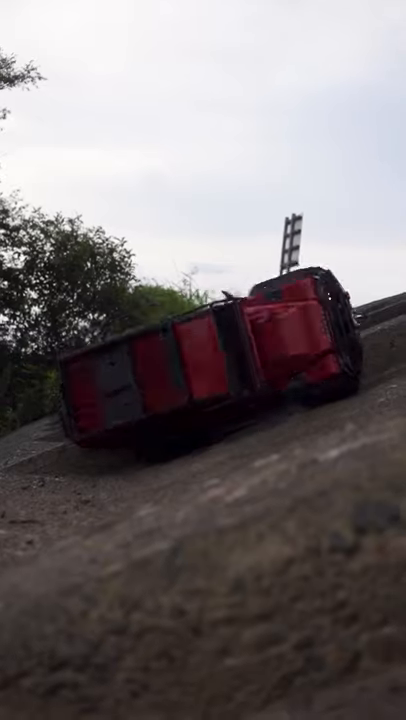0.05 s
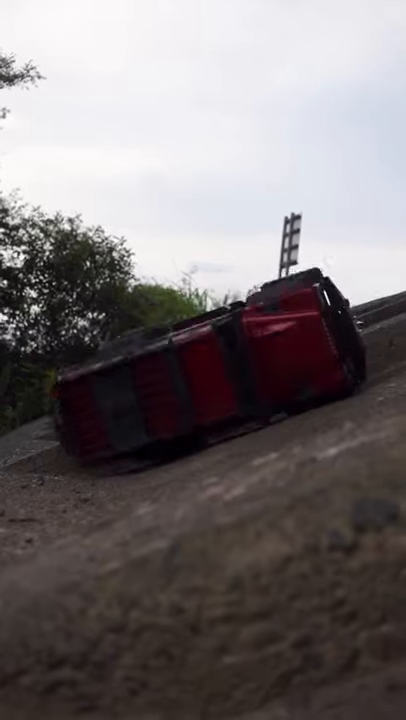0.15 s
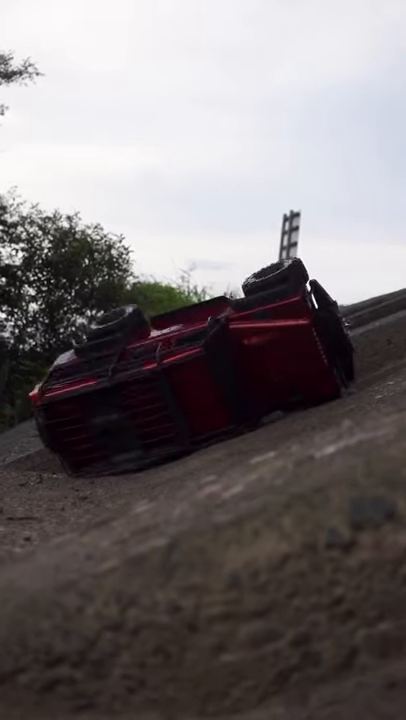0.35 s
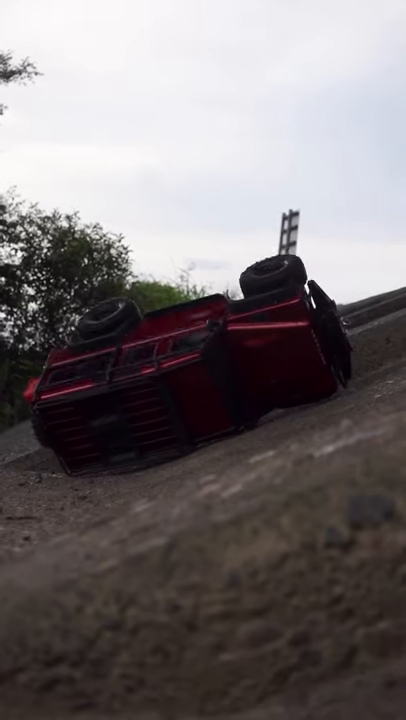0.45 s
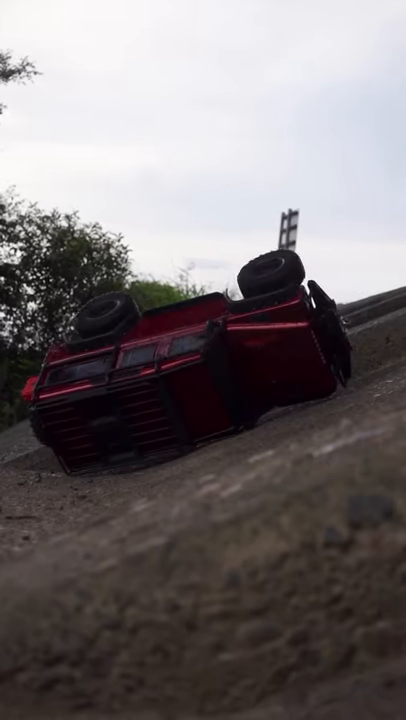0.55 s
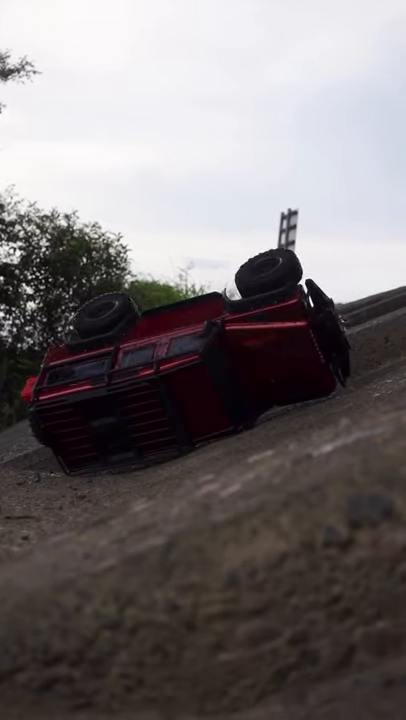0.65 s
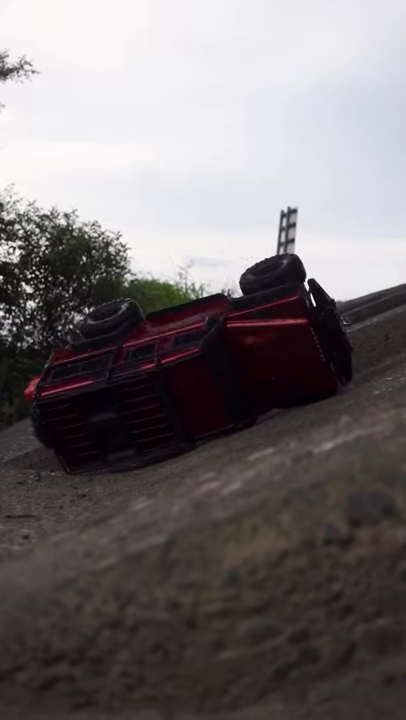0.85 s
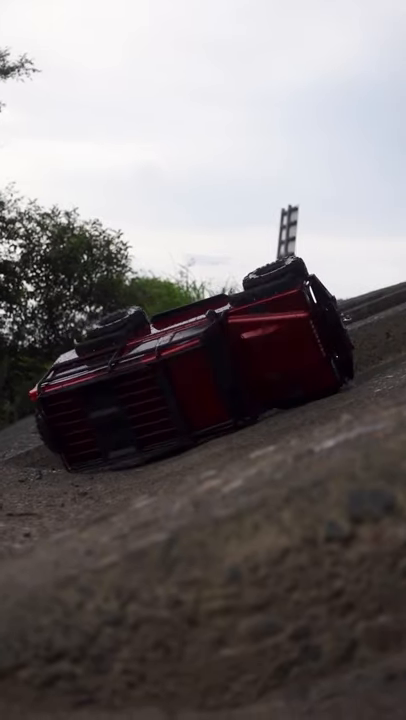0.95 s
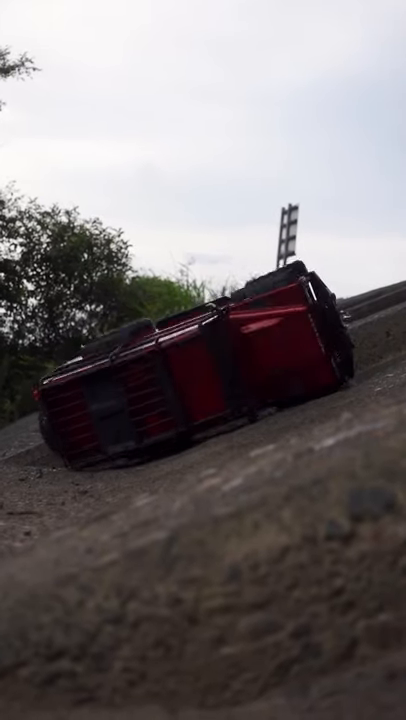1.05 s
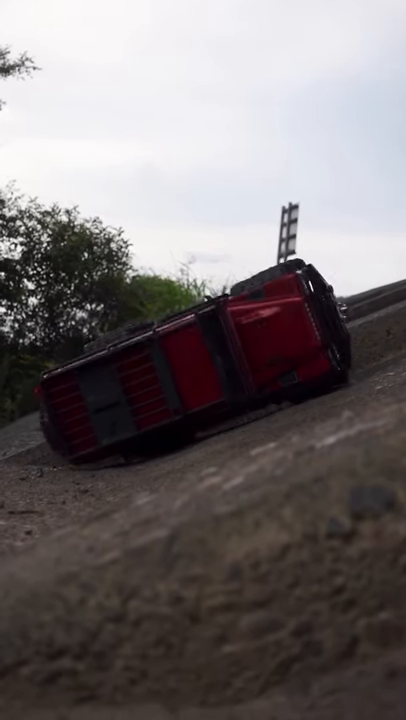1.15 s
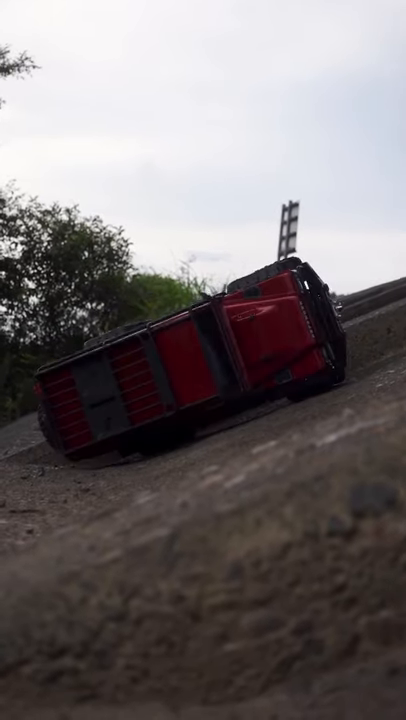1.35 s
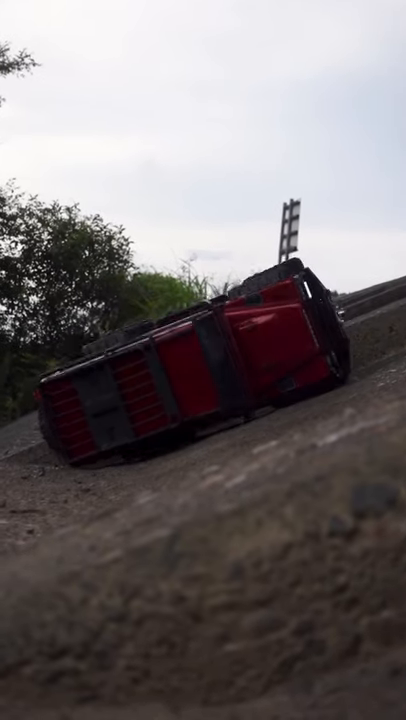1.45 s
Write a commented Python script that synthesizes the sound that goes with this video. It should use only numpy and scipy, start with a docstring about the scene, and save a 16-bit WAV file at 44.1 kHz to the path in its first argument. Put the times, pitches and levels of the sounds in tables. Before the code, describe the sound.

A small plastic toy truck tips over on a hard slope: hollow slam and gritty scrape, quiet rocking knocks, then a lighter clack as it falls back. Close stereo microphone outdoors, faint cicadas, ticking katydids and distant air.

```python
"""On a hard slope outdoors, air rumbles far off; a cicada chorus hums and two katydids tick higher up.
Near a pair of close microphone ports a small plastic truck tips over: its hollow shell slams down,
scrapes, rocks with small knocks and falls back. Air and cicadas are coloured noise, katydids are
pulsed noise through wing resonances, the shell is decaying modes, and the ground adds thud and grit.
"""
import sys
import numpy as np
from scipy import signal
from scipy.fft import rfft, irfft, next_fast_len
from scipy.io import wavfile
from scipy.ndimage import map_coordinates

SR = 44100
rng = np.random.default_rng(int(sys.argv[2]) if len(sys.argv) > 2 else 0)


def unload_wav(signal):
    """Save mono or channel-first audio to the path in sys.argv[1] as 16-bit WAV at rate SR, clipped to [-1, 1]."""
    wavfile.write(
        sys.argv[1],
        SR,
        np.round(np.clip(np.atleast_2d(signal).T, -1, 1) * 32767).astype(np.int16),
    )


N = 66150  # samples, 1.5 s


def amp(db):
    """Turn dB into linear gain."""
    return 10 ** (np.asarray(db) / 20)


def unit(x):
    """Scale a signal to rms 1."""
    return x / np.sqrt(np.mean(x ** 2) + 1e-20)


def noise():
    """White noise over the whole scene."""
    return rng.standard_normal(N)


def along(points, hz):
    """Interpolate (Hz, value) points on a log frequency axis."""
    point_hz, value = np.transpose(points)
    return np.interp(np.log(hz + 1), np.log(point_hz + 1), value)


def curves(rows):
    """One value per sample for each column after the time; -120 before the first row."""
    seconds, *columns = np.transpose(rows)
    return [np.interp(np.arange(N) / SR, seconds, column, left=-120) for column in columns]


def wobble(rate):
    """A smooth random curve with `rate` knots a second."""
    knots = rng.standard_normal(int(N * rate / SR) + 4)
    return map_coordinates(knots, [np.arange(N) * rate / SR])


def filtered(x, response):
    """Multiply the spectrum of x by a complex response of frequency."""
    size = next_fast_len(N + SR // 2)
    return irfft(rfft(x, size) * response(np.fft.rfftfreq(size, 1 / SR)), size)[..., :N]


def coloured(x, spectrum):
    """Shape x by a relative spectrum that is closed at both ends, then scale to rms 1."""
    below = (spectrum[0][0] * .9, -90)
    above = (spectrum[-1][0] * 1.06, -90)
    closed = [below, *spectrum, above]
    return unit(filtered(x, lambda hz: amp(along(closed, hz))))


def resonances(peaks):
    """Causal response of (Hz, width in Hz, dB) resonators, added with alternating signs."""
    def response(f):
        total = 0
        for k, (centre, width, db) in enumerate(peaks):
            damping = 1j * f * width
            total = total + (-1) ** k * amp(db) * damping / (centre ** 2 - f ** 2 + damping)
        return total
    return response


def impulses(per_s, spread_db):
    """Random contacts of uneven size and either sign."""
    happens = rng.random(N) < per_s / SR
    return happens * noise() * amp(spread_db * rng.exponential(size=N))


# Spectrum of the distant air. Each row: frequency in Hz, relative density in dB per Hz.
AIR = [(15, -47), (25, -24.5), (91, -1), (212, -6), (409, -11), (657, -16), (876, -16.5), (1270, -27),
       (1530, -23.5), (1950, -30), (2350, -16), (3400, -20.5), (4420, -47), (7480, -120)]
# Loudness of the distant air. Each row: time in seconds, level in dB before the random lumps.
AIR_LEVEL = [(0., -50), (.13, -56.5), (.3, -49), (1.5, -55)]
# Spectrum of the faint hiss. Each row: frequency in Hz, relative density in dB per Hz.
HISS = [(2410, -45), (4100, -7), (4170, -19.5), (4660, -39), (4720, -35), (6290, -33.5), (8190, -30),
        (8750, -35), (10000, -29), (11000, -32), (14300, -66), (22000, -120)]
RUMBLE_HZ, HISS_DB = 172, -65.5  # split between rumble and steadier air; hiss rms


def air():
    """Far rumble coming in lumps under steadier air, with a faint hiss: all shaped noise."""
    far = amp(curves(AIR_LEVEL)[0]) * coloured(noise(), AIR)
    rumble = filtered(far, lambda hz: 1 / (1 + (hz / RUMBLE_HZ) ** 4))
    hiss = amp(HISS_DB) * coloured(noise(), HISS)
    lumps = amp(3 * wobble(14))
    steadier = amp(1.5 * wobble(8.4))
    return lumps * rumble + steadier * (far - rumble) + hiss


# Spectrum of the blended cicadas. Each row: frequency in Hz, relative density in dB per Hz.
CHORUS = [(1940, -39.5), (3300, -27), (3430, -75), (3470, -0.5), (3680, 16), (3820, 20), (3940, 18),
          (4200, -41.5), (4300, -2.5), (5590, -65.5), (9460, -120)]
# Loudness of the chorus. Each row: time in seconds, level in dB before the random wobble.
CHORUS_LEVEL = [(0.0, -47.5), (0.442, -48.5), (0.976, -47), (1.16, -48.5), (1.5, -48)]


def cicadas():
    """Many singers blend into one narrow band of noise whose level wavers fast and slowly."""
    level_db, = curves(CHORUS_LEVEL)
    waver_db = 0.9 * wobble(22) + 0.68 * wobble(6.57)
    return amp(level_db + waver_db) * coloured(noise(), CHORUS)


# Wing resonances, one list a singer. Each row: frequency in Hz, width in Hz, gain in dB for one pass.
KATYDID = [
    [(7550, 130, -1.5), (8960, 350, 0)],
    [(9630, 480, 2), (10300, 300, -7)],
]
# Loudness of the song. Each row: time in seconds, then each singer's level in dB before the swells.
SONG = [(0.0, -79, -77.5), (0.178, -80, -88), (0.274, -79, -70), (0.422, -77.5, -80), (0.784, -74, -83),
        (1.168, -84.5, -70), (1.186, -78.5, -73), (1.398, -83.5, -73.5), (1.5, -75, -73.5)]
TICKS_HZ, TICK_S = (39.8, 32), (.705, .955)  # mean tick rate; time near which a tick peaks (s)
SWELL_HZ, SWELL_S, SWELL_DB = 7.95, .705, 3.5  # rate, time of one peak (s), rise and fall


def katydids():
    """Noise passes twice through each singer's wings and is pulsed into ticks that swell together."""
    t = np.arange(N) / SR
    swell_db = SWELL_DB * np.cos(2 * np.pi * SWELL_HZ * (t - SWELL_S))
    out = np.zeros(N)
    for peaks, song_db, rate_hz, peak_s in zip(KATYDID, curves(SONG), TICKS_HZ, TICK_S):
        wings = resonances(peaks)
        phase = 2 * np.pi * rate_hz * (t - peak_s) + 2 * wobble(9.6)  # uneven timing
        ticks = unit(np.abs(0.61 + 0.42 * np.cos(phase)) ** 0.94)
        voice = unit(filtered(filtered(noise(), wings), wings))
        out += amp(song_db + swell_db + 3.5 * wobble(25)) * ticks * voice
    return out


# Modes of the hollow shell, for scrape and knocks.
# Each row: nominal frequency in Hz, relative level in dB, time to decay by 60 dB in seconds.
SHELL = [(98, -14, .12), (140, -16, .08), (236, 0, .14), (282, 0, .1), (322, -1, .09), (365, 0, .11),
         (472, 0, .09), (570, -2, .06), (750, -8, .05), (990, -8, .07), (1065, -8, .07), (1500, -12, .03),
         (2250, -15, .025), (3050, -14, .04)]
UPPER_HZ = 680  # the shell's upper modes start here
# Shell dragging on the ground. Each row: time in seconds, then relative levels in dB of
# the ringing body, the thud under it, the mid rattle, the crunch and the grit.
SCRAPE = [(.18, -65, -63, -83, -76, -93), (.19, -31, -71, -55, -73.5, -87),
          (.206, -28.5, -27.5, -49, -58, -77.5), (.226, -22, -32, -41, -50.5, -70),
          (.23, -32, -30.5, -36.5, -34.5, -54), (.243, -17, -25.5, -25.5, -33.5, -45),
          (.266, -17, -22, -28.5, -35.5, -48.5), (.295, -23, -26.5, -31.5, -40, -48.5),
          (.32, -25, -32, -37, -43, -54.5), (.35, -20.5, -26.5, -27, -39.5, -52),
          (.37, -28, -37.5, -38.5, -44.5, -55.5), (.4, -30, -38, -42, -48.5, -60.5),
          (.452, -34.5, -44.5, -45.5, -55, -65), (.5, -48, -72, -48, -58, -68),
          (.57, -45.5, -51, -54.5, -59, -72), (.62, -38.5, -38, -58, -58, -87),
          (.67, -55, -57, -56.5, -76, -95), (.75, -55.5, -45.5, -66.5, -67, -82),
          (.85, -49, -45.5, -82, -71, -92), (.94, -69, -46, -97, -88, -90),
          (1., -46, -54.5, -64.5, -56.5, -81), (1.03, -57, -51.5, -91, -87, -98),
          (1.112, -47.5, -64, -82, -77, -94), (1.128, -32, -57, -61, -64, -86),
          (1.148, -32, -35, -40.5, -44.5, -59), (1.186, -39, -35, -52.5, -51, -68),
          (1.191, -18, -32, -31, -32, -51.5), (1.21, -27, -35.5, -37.5, -53.5, -55),
          (1.23, -32, -33, -45, -50.5, -63.5), (1.265, -33, -42.5, -44.5, -51, -65),
          (1.32, -40.5, -43.5, -48.5, -56.5, -71.5), (1.373, -45, -43, -56.5, -60.5, -75),
          (1.42, -53, -81, -62, -61.5, -89), (1.476, -55, -79, -57, -59, -86),
          (1.49, -55, -44, -37.5, -56, -85)]
# Spectra of thud, rattle, crunch and grit. Each row: frequency in Hz, relative density in dB per Hz.
THUD = [(40, -29), (70, -8), (100, -8), (130, -5.5), (200, -12.5)]
RATTLE = [(500, -8), (700, 1), (1100, -4.5), (1500, -7), (2000, -18), (2400, -19)]
CRUNCH = [(1700, 2.5), (2100, -1.5), (3000, -2), (3900, -1.5), (4500, -7), (5200, -43)]
GRIT = [(2710, -18), (4600, -1.5), (6020, -12.5), (6840, -9), (8290, -23.5), (9870, -28.5), (10400, -35),
        (11000, -22), (14300, -74), (22000, -120)]
THUD_HZ, THUD_ROUGH = 96.88, 0.58  # the ground's soft note; gain of the noise in it
NOTE_DB = -32  # thud level at which the note is at half gain


def grains():
    """Dense small ground contacts, 8000 a second on average."""
    return impulses(8000, spread_db=1.2)


def scrape():
    """Small contacts ring the shell's low modes and thud the ground; grit crunches under it."""
    body_db, thud_db, rattle_db, crunch_db, grit_db = curves(SCRAPE)
    # a mode's width follows from its decay time
    low_modes = [(hz, np.log(1000) / np.pi / t60, db) for hz, db, t60 in SHELL if hz < UPPER_HZ]
    ring = resonances(low_modes)
    contacts = unit(impulses(2500, spread_db=1.2))
    body = filtered(amp(body_db - 6) * contacts, ring) / np.std(filtered(contacts, ring))

    phase = 2 * np.pi * np.cumsum(THUD_HZ * (1 + 0.043 * wobble(25.47))) / SR
    note_gain = 1 / (1 + amp(2 * (NOTE_DB - thud_db)))  # weak thuds barely sound the note
    thud = amp(thud_db) * (note_gain * np.sin(phase) + THUD_ROUGH * coloured(noise(), THUD))

    rattle = amp(rattle_db + 0.39 * wobble(90)) * coloured(grains(), RATTLE)
    bursts_db = 0.94 * wobble(120)  # shared by crunch and grit
    crunch = amp(crunch_db + 2 + bursts_db) * coloured(grains(), CRUNCH)
    grit = amp(grit_db + bursts_db) * coloured(grains(), GRIT)
    return body + thud + rattle + crunch + grit


# Single blows on the shell. Each row: start in seconds, relative level in dB, low pitch struck most
# in Hz, upper pitch struck most in Hz, relative upper-mode level in dB, relative crack level in dB.
KNOCKS = [(0.186, -34, 339, 900, -16, -31), (.195, -29.5, 282, 3020, -2, -31),
          (.215, -22, 474, 750, -10, -16), (.228, -25.5, 524, 1500, 5, -9.5),
          (0.238, -9, 362, 730, -8, -18.5), (.252, -14.5, 237, 710, -27, -27),
          (.260, -22.5, 222, 970, -2.5, -19), (.267, -16, 233, 1070, -19, -18.5),
          (.277, -17.5, 364, 900, -19, -24), (0.288, -14, 351, 903, -33, -31),
          (0.31, -23.5, 400, 896, -10, -21), (.329, -16, 371, 975, -20, -24),
          (0.338, -17, 540, 763, -9, -25), (.346, -20, 389, 1065, -6, -24), (.354, -25, 546, 1280, -4, -24),
          (0.509, -33.5, 292, 1110, -18, -4.5), (.592, -24, 565, 946, -5.5, -18.5),
          (.598, -22, 263, 1500, -20, -27), (0.617, -27, 228, 1060, -37, -32),
          (.636, -30, 230, 750, -13, -32), (.666, -49, 475, 990, 2, -21), (0.692, -42, 236, 766, -6, -31),
          (0.793, -29, 220, 690, -13, -19), (.834, -26.5, 222, 936, -15, -28),
          (.841, -29, 236, 760, -12, -24), (.858, -41.5, 235, 990, -22, -13),
          (.890, -33, 483, 740, -23, -27), (0.98, -36, 296, 1065, -6, -7),
          (.995, -39.5, 307, 760, -9, -4.5), (1.014, -36, 285, 1050, -31, -26),
          (1.12, -27.5, 385, 1290, -12.5, -31), (1.135, -25, 280, 940, -11, -18.5),
          (1.145, -24, 376, 1065, -18, -15.5), (1.153, -23.5, 286, 750, -12, -20),
          (1.16, -34.5, 384, 1070, -7, -18), (1.189, -17, 377, 3050, -5, 0.5),
          (1.189, -22, 580, 1150, -2, -20), (1.195, -17.5, 370, 747, -2.5, -22),
          (1.207, -21.5, 312, 750, -15, -37), (1.276, -29, 404, 745, -4, -14),
          (1.482, -21, 266, 900, -10.5, -30), (1.489, -22, 286, 2200, -18, -12)]
FOCUS_DB, UPPER_FOCUS_DB = 70, 90  # loss per squared octave from the struck pitch
SCATTER_DB, DETUNE = 1.5, .01  # spread of mode levels; relative spread of mode pitches
RISE_CYCLES, CRACK_T60 = 0.49, 0.0061  # time constant of a mode's onset; crack's 60 dB decay (s)


def knocks():
    """Each blow rings the modes near where it lands, flexed slightly off pitch, with a short crack."""
    out = np.zeros(N + SR)
    t = np.arange(SR // 4) / SR
    hz, level_db, t60 = np.transpose(SHELL)
    crack_band = signal.butter(3, [600, 5200], 'band', fs=SR, output='sos')
    for start, db, struck_hz, upper_hz, upper_db, crack_db in KNOCKS:
        low_share = -FOCUS_DB * np.log2(hz / struck_hz) ** 2
        upper_share = upper_db + 7.5 - UPPER_FOCUS_DB * np.log2(hz / upper_hz) ** 2
        share_db = np.where(hz < UPPER_HZ, low_share, upper_share)
        gain = amp(level_db + share_db + rng.normal(0, SCATTER_DB, len(hz)))
        pitch = hz[:, None] * (1 + DETUNE * rng.standard_normal((len(hz), 1)))
        decay = amp(-60 * t / t60[:, None])
        rise = 1 - np.exp(-t * hz[:, None] / RISE_CYCLES)
        ring = gain @ (decay * np.sin(2 * np.pi * pitch * t) * rise)
        burst = signal.sosfilt(crack_band, rng.standard_normal(len(t)))
        crack = amp(crack_db + 6 - 60 * t / CRACK_T60) * burst
        first = round(start * SR)
        out[first:first + len(t)] += amp(db - 4.0) * (ring + crack)
    return out[:N]


# Stereo width of the air and insects, then of the truck.
# Each row: frequency in Hz, level of the side signal relative to the mid in dB.
SIDE_AIR = [(100, -16.5), (1000, -8.5), (2500, -10.5), (3800, -10.5), (4500, -12.5), (5000, -29),
            (10000, -25)]
SIDE_TRUCK = [(100, -29), (700, -28.5), (1500, -14.5), (3000, -15.5), (4500, -25.5), (5000, -41),
              (10000, -40.5)]
SCATTER_HZ, SCATTER_DELAY_S = 80, .006  # spacing of random phases; delay of the side signal


def spread(x, side):
    """Two close microphone ports: a weak copy with scattered phase differs between them."""
    turns = rng.uniform(0, 2 * np.pi, SR // SCATTER_HZ)

    def response(hz):
        scatter = np.interp(hz / SCATTER_HZ, np.arange(len(turns)), turns)
        phase = scatter - 2 * np.pi * hz * SCATTER_DELAY_S
        return amp(along(side, hz)) * np.exp(1j * phase)

    difference = filtered(x, response)
    return np.array([x + difference, x - difference])


def scene():
    """Air and insects around the slope, with the truck on the ground."""
    surroundings = air() + cicadas() + katydids()
    truck = scrape() + knocks()
    return spread(surroundings, SIDE_AIR) + spread(truck, SIDE_TRUCK)


FADE_HZ, TOP_HZ = 10440, 10950  # treble starts to fade; nothing is kept from here up


def record(dry):
    """The camera's band limit: treble fades by up to 12 dB, then stops."""
    def response(hz):
        fade = np.clip((hz - FADE_HZ) / (TOP_HZ - FADE_HZ), 0, 1)
        return (hz < TOP_HZ) * amp(-12 * fade ** 2)
    return filtered(dry, response)


dry = scene()
out = record(dry)
unload_wav(out)
```